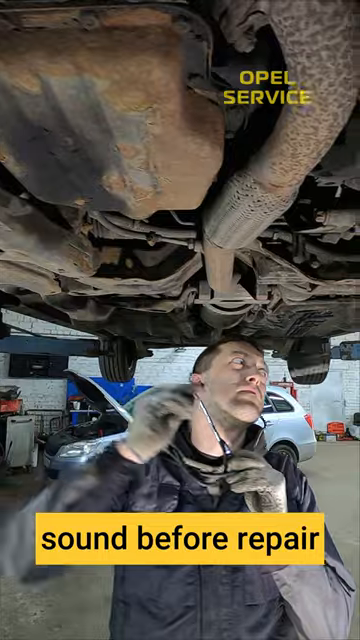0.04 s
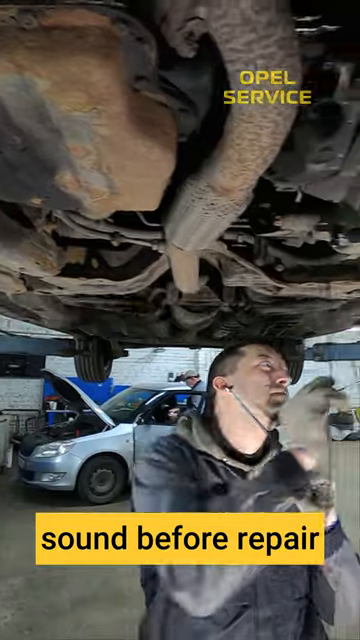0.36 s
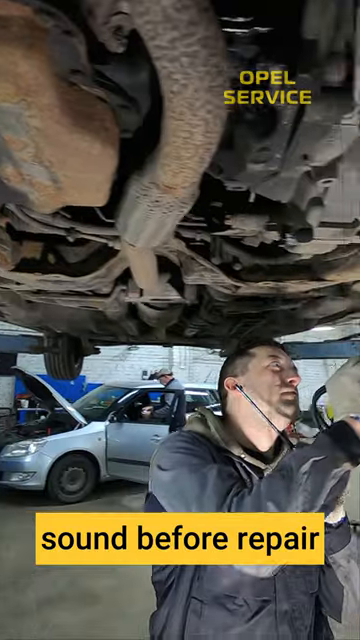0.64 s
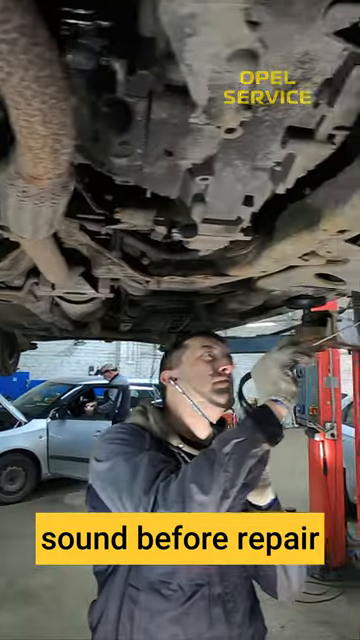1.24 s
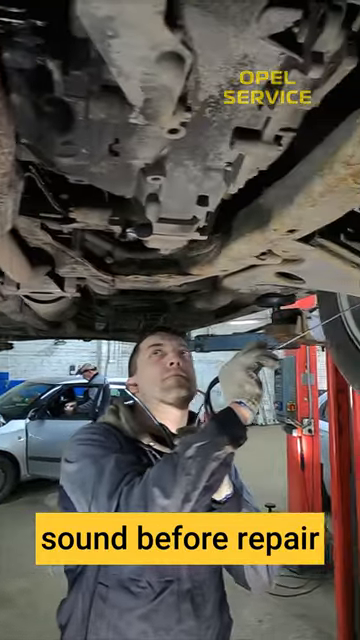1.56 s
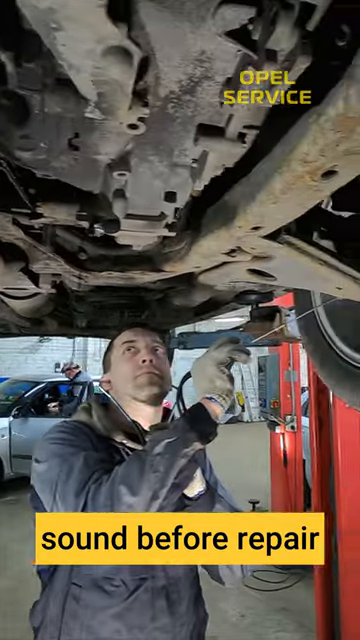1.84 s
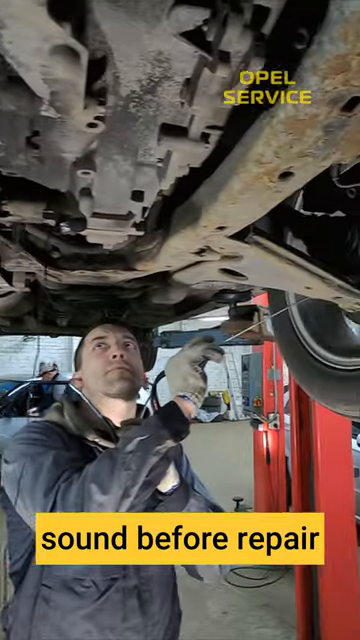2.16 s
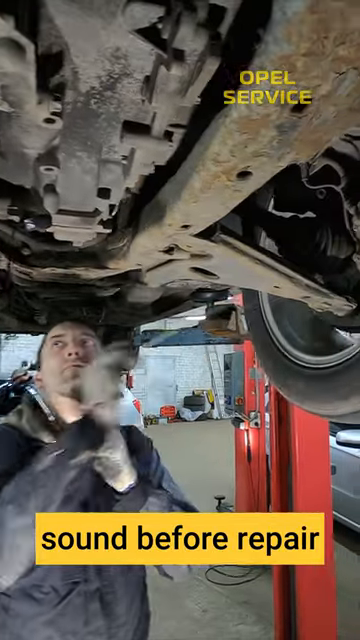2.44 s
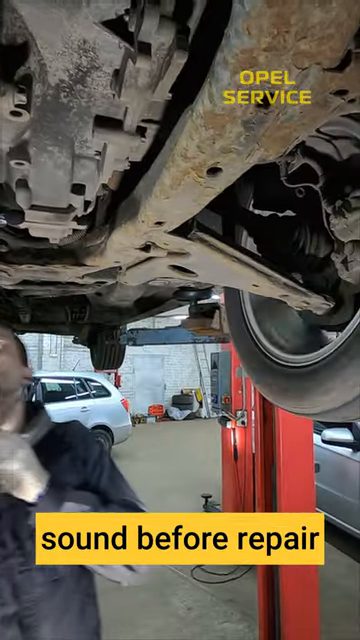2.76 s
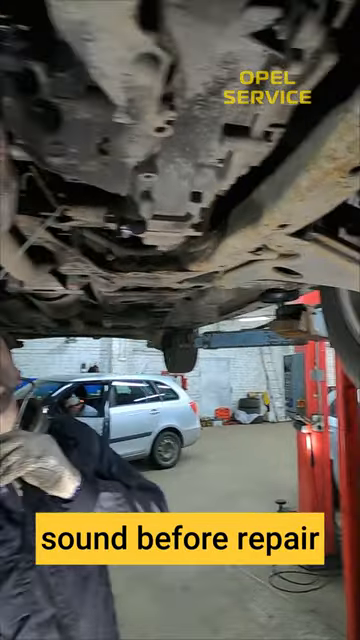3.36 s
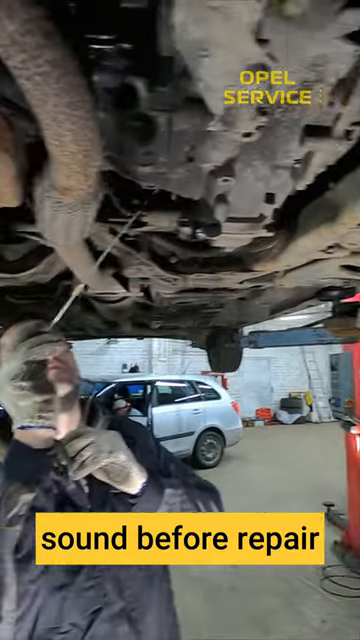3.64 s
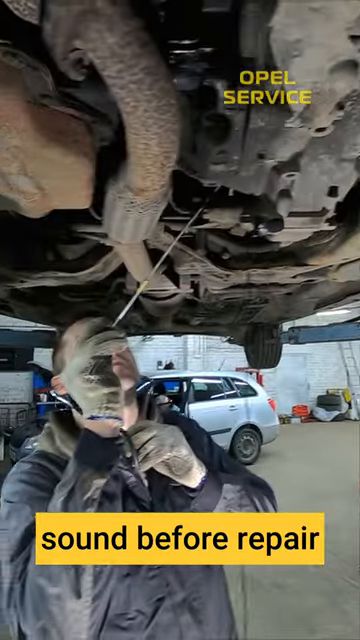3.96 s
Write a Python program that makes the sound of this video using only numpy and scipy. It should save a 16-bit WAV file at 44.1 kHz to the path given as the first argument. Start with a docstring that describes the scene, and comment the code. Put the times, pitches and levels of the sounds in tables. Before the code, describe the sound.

A car gearbox gives a rough, ringing grind, heard from under a workshop lift. Its whine falls and the grind dulls over a hollow drone and low engine rumble. Later come a brief swell and a few light metal ticks.

```python
"""A rough, ringing grind with a falling whine: a car's gearbox slowing down, heard from under a lift.
Worn bearings rattle the metal casing and grow duller and quieter as the shafts lose speed.
Gear tones glide down through a hollow drone near 400 Hz, over the engine's low rumble.
In the second half the grind swells briefly and a small metal part gives a few light ticks."""
import sys
import numpy as np
from scipy import signal
from scipy.fft import rfft, irfft
from scipy.io import wavfile

SR = 44100
rng = np.random.default_rng(int(sys.argv[2]) if len(sys.argv) > 2 else 0)


def materialize(psi):
    """Save the field psi as 16-bit PCM at rate SR to the path in sys.argv[1].

    A 1-D psi becomes a single channel; in a 2-D psi each row is a channel.
    """
    bounded = np.clip(np.atleast_2d(psi).T, -1, 1)
    quanta = np.round(bounded * 32767).astype(np.int16)
    wavfile.write(sys.argv[1], SR, quanta)


N = 176400
T, HZ = np.arange(N) / SR, np.fft.rfftfreq(N, 1 / SR)

# how the grind and its whistles fade (time [s], relative level [dB])
GRIND_FADE = [(0, -19.5), (.45, -19), (1, -19.5), (1.6, -20.5), (2.1, -21.5), (2.6, -22), (3, -23.5),
              (3.5, -25), (3.8, -27), (4, -28)]
# deep tone of the engine's rumble, which also shapes the shaft hum (frequency [Hz], gain [dB])
RUMBLE_COLOUR = [(15, -8), (30, -5), (50, -6), (68, 8), (88, 0), (125, -11), (150, -12), (182, -1.5),
                 (215, -17), (600, -60)]


def amp(db):
    """Turns decibels into a number to multiply by."""
    return 10 ** (np.asarray(db) / 20)


def unit(x):
    """Scales a signal to an average strength (rms) of 1."""
    return x / np.sqrt(np.mean(abs(x) ** 2) + 1e-20)


def curve(points):
    """Joins points in time with straight lines."""
    return np.interp(T, *np.transpose(points))


def read(points, hz):
    """Looks up a table by frequency, giving each octave equal room."""
    frequencies, values = np.transpose(points)
    return np.interp(np.log(hz + 1), np.log(frequencies), values)


def colour(x, db):
    """Makes each frequency louder or softer by the given decibels."""
    log_gain = np.log(amp(np.maximum(db, -100)))
    cepstrum = irfft(log_gain, N)
    # fold the filter so that ringing follows a hit and never comes before it
    cepstrum[1:N // 2] *= 2
    cepstrum[N // 2 + 1:] = 0
    return irfft(rfft(x) * np.exp(rfft(cepstrum)), N)


def noise(points):
    """Noise of strength 1, shaped by a table of frequencies and gains."""
    return unit(colour(rng.standard_normal(N), read(points, HZ)))


def wander(rate_hz):
    """A random wobble, mostly slower than the given rate."""
    return unit(irfft(rfft(rng.standard_normal(N)) / (1 + (HZ / rate_hz) ** 4), N))


def peaks(modes):
    """The boost in dB around each pitch at which a part likes to ring."""
    return sum(db / (1 + (2 * (HZ - hz) / width) ** 2) for hz, width, db in modes)


def bearings(speed):
    """Balls roll over a pitted track; their hiss and tiny hits ring the metal, duller as they slow."""
    # throbbing in step with the shaft (rate [cycles per turn], depth [fraction])
    throbs = [(.25, 0.028), (1, 0.059), (1.9, 0.044), (7.9, 0.027)]
    # overall tone of the grind (frequency [Hz], gain [dB])
    grind_colour = [(150, -21.5), (400, -15.5), (620, -17), (900, -10), (1500, -6), (2700, -14.5),
                    (3050, -11.5), (4700, -19.5), (7500, -16.5), (9000, -22.5), (11500, -27.5),
                    (15500, -35)]
    # ringing of the casing walls (frequency [Hz], width [Hz], boost [dB])
    casing = [(598, 46, 7.5), (729, 200, 6.5), (989, 75, 8), (1194, 59, 4.5), (1386, 114, 2.5),
              (1877, 173, 6.5), (2001, 33, 8), (2140, 130, 4.5), (2346, 128, 9), (2612, 164, 11),
              (2810, 113, 9)]
    # ringing of the steel shafts, gears and bearing rings (frequency [Hz], width [Hz], boost [dB])
    steel = [(3327, 150, 6.5), (3640, 150, 5), (3824, 97, 2.5), (4266, 420, 12.0), (4480, 39, 4),
             (4930, 193, 5), (5320, 590, 5.5), (6190, 460, 5.5), (6750, 170, 5), (7230, 250, 7),
             (7730, 174, 4), (8550, 240, 6.2), (9412, 430, 5.5), (10680, 510, 6.0), (12087, 440, 4),
             (12861, 600, 3.2), (15306, 316, 2)]
    # faster sounds brighter (frequency [Hz], gain [dB per doubling of speed])
    brighten = [(500, -6.5), (1000, -.5), (2600, 0), (4200, 3.5), (7000, 4.5), (10000, 6), (15000, 5.5)]
    mid_speed, hits_per_s = 24, 3400  # shaft turns per second, and the hit rate at that speed
    hit_spread_db, hit_share = 2.5, .39  # the rest of the power is rolling hiss
    flutter_db, flutter_hz, grind_boost_db = -.1, 70, 2

    hits = rng.random(N) < hits_per_s * speed / mid_speed / SR
    hits = hits * rng.choice([-1, 1], N)
    hits = hits * amp(hit_spread_db * np.minimum(rng.exponential(1, N), 4))
    crackle = unit(hits / np.sqrt(speed))
    shaking = np.sqrt(hit_share) * crackle + np.sqrt(1 - hit_share) * rng.standard_normal(N)
    turns = np.cumsum(speed) / SR
    shaking *= 1 + sum(depth * np.cos(2 * np.pi * (rate * turns + rng.random())) for rate, depth in throbs)
    shaking *= amp(flutter_db * wander(flutter_hz))
    ringing = unit(colour(shaking, read(grind_colour, HZ) + peaks(casing) + peaks(steel)))

    # give each short slice of sound the brightness that goes with its speed
    hz, times, slices = signal.stft(ringing, SR, nperseg=512)
    doublings = np.log2(np.interp(times, T, speed) / mid_speed)
    slices *= amp(read(brighten, hz)[:, None] * doublings)
    return signal.istft(slices, SR)[1][:N] * amp(curve(GRIND_FADE) + grind_boost_db)


def underbody(x):
    """Sound bounces between the parts under the car, adding echoes that die quickly."""
    echo_db, fade_s = -18, .06  # fade_s: time to fall by 60 dB
    age = T[T < fade_s]
    tail = rng.standard_normal(len(age)) * (age > .002) * amp(-60 * age / fade_s)
    return x + amp(echo_db) * signal.fftconvolve(x, tail / np.linalg.norm(tail))[:N]


def whistles():
    """The grind keeps the metal's longest-ringing notes going as thin whistles of steady pitch."""
    # notes that sing out (frequency [Hz], half-width [Hz], level added to GRIND_FADE [dB])
    notes = [(990, 22, -18.5), (1190, 15, -25), (1858, 26, -18), (2633, 52, -19), (4210, 37, -29)]
    ringing = np.zeros(N)
    for hz, width, db in notes:
        band_db = -20 * np.log10(1 + ((HZ - hz) / width) ** 2)
        ringing += amp(db) * unit(colour(rng.standard_normal(N), band_db))
    return ringing * amp(curve(GRIND_FADE))


def shaft_tone(speed, per_turn):
    """A slightly unsteady tone that vibrates per_turn times for each turn of the shaft."""
    waver_depth, waver_hz = .38, 10
    waver = unit(1 + waver_depth * (wander(waver_hz) + 1j * wander(waver_hz)))  # in level and pitch
    cycles = per_turn * np.cumsum(speed) / SR + rng.random()
    return np.sqrt(2) * (waver * np.exp(2j * np.pi * cycles)).real


def gears(speed):
    """Gear tones and a low shaft hum glide down, swelling at pitches where the gearbox rings."""
    # gear tones (rate [cycles per turn], level where the housing rings most [dB])
    gear_tones = [(6, -27.5), (8.1, -33.5), (9.45, -30.5), (10.25, -34), (12.97, -31), (13.2, -40.5),
                  (19, -37.5), (20.3, -42.5), (22.25, -33), (23.1, -34), (26.4, -38), (33.3, -39.5)]
    # how well the housing passes each pitch (frequency [Hz], gain [dB])
    housing = [(100, -44.5), (150, -26.5), (182, -20), (212, -25.5), (255, -13.5), (290, -21), (330, -13.5),
               (358, -1), (420, -1), (485, 0), (530, -5), (620, -15), (900, -25)]
    hum_per_turn, hum_gain_db = 3.4, -57
    whine = sum(amp(db + read(housing, rate * speed)) * shaft_tone(speed, rate) for rate, db in gear_tones)
    hum_level = amp(hum_gain_db + read(RUMBLE_COLOUR, hum_per_turn * speed))
    return whine + hum_level * shaft_tone(speed, hum_per_turn)


def drone():
    """Random shaking from the turning parts makes the gearbox and underbody drone."""
    # hollow tone of the drone (frequency [Hz], gain [dB])
    hollow = [(100, -36.5), (180, -20), (215, -23), (255, -13), (320, -11.5), (370, -0.5), (430, 0.5),
              (500, -0.5), (620, -10), (900, -31.5), (2000, -70)]
    # loudness of the drone (time [s], level [dB])
    loudness = [(0, -30), (.6, -30), (1, -29), (1.5, -30), (2.1, -30), (2.7, -29), (3.3, -28.5), (4, -28)]
    return noise(hollow) * amp(curve(loudness))


def engine_rumble(level_db=-51):
    """The engine's shaking, heard as a steady, deep noise."""
    return noise(RUMBLE_COLOUR) * amp(level_db)


def surge(peak_time_s=2.35, half_length_s=.055, peak_db=-22.5):
    """The middle pitches of the grind swell briefly."""
    # tone of the swell (frequency [Hz], gain [dB])
    surge_colour = [(300, -30), (800, -5), (1400, 5), (2400, -5), (4000, -22), (9000, -47)]
    swell = np.exp(-((T - peak_time_s) / half_length_s) ** 2)
    return noise(surge_colour) * amp(peak_db) * swell


def ticks():
    """Light taps make a small metal part ring for a moment."""
    # the taps (time [s], level [dB])
    taps = [(2.651, -18), (2.671, -24), (3.07, -34), (3.767, -25)]
    # overall tone of a tap (frequency [Hz], gain [dB])
    tap_colour = [(200, -23), (600, 4), (2000, 5), (6000, -5), (9000, -10), (13000, -19), (15500, -24)]
    # ringing of the small part (frequency [Hz], width [Hz], boost [dB])
    small_part = [(4320, 250, 12), (5570, 390, 11), (7350, 500, 8), (12000, 500, 6), (14630, 400, 15)]
    fade_s = .08  # time to fall by 60 dB
    out = np.zeros(N)
    for start, db in taps:
        ringing = unit(colour(noise(tap_colour), peaks(small_part)))
        age = np.maximum(T - start, 0)
        out += (T >= start) * amp(db - 60 * age / fade_s) * ringing
    return out


def scene():
    """Adds up all the sounds, the same for the left and right ear."""
    # the shaft slowing down (time [s], speed [turns per second])
    slowing = [(0, 33.5), (.3, 29.7), (.6, 27.7), (.85, 26.4), (1.3, 24.4), (1.8, 21), (2.2, 19.3),
               (2.45, 17), (2.75, 15.7), (3.1, 14.1), (3.6, 11.7), (4, 10.6)]
    speed = curve(slowing)
    grind = underbody(bearings(speed)) + whistles() + surge()
    mix = grind + gears(speed) + drone() + engine_rumble() + ticks()
    return np.array([mix, mix])


def record(dry):
    """Switches the sound on abruptly and removes the very highest treble."""
    start_s, cutoff_hz = .035, 15750
    fade_in = np.clip((T - start_s) / .002, 0, 1)
    low_pass = signal.firwin(801, cutoff_hz, window=("kaiser", 9), fs=SR)
    return signal.oaconvolve(dry * fade_in, low_pass[None], "same", axes=1)


dry = scene()
out = record(dry)
materialize(out)
```